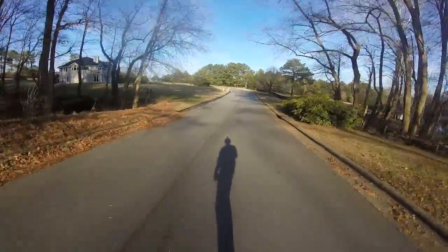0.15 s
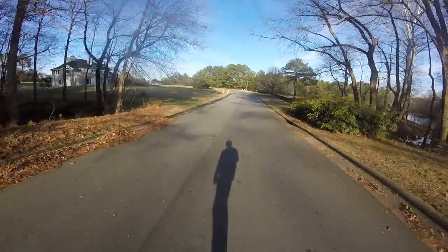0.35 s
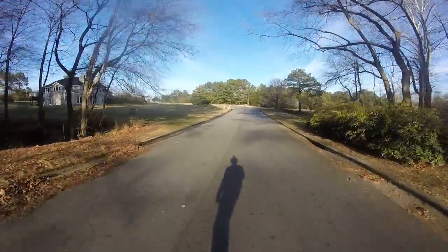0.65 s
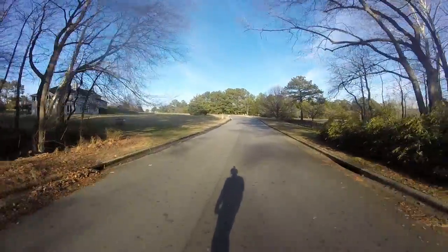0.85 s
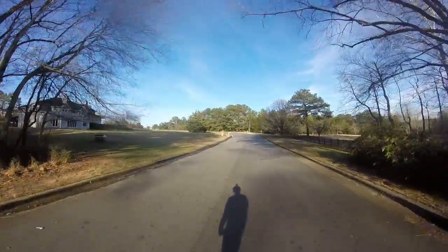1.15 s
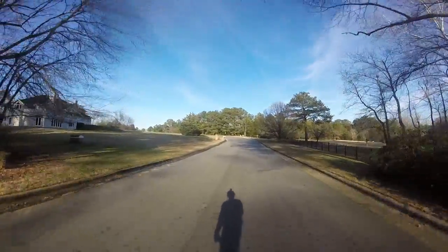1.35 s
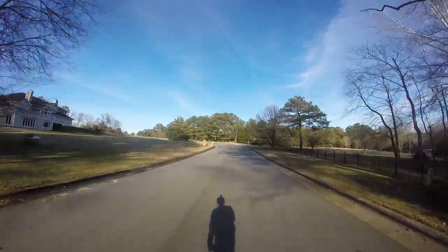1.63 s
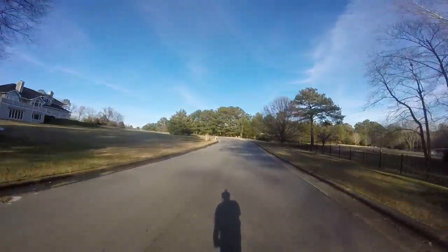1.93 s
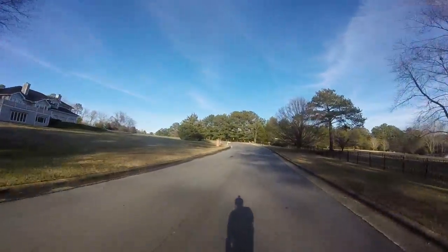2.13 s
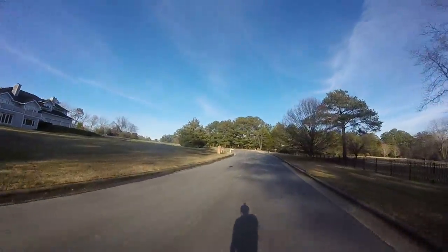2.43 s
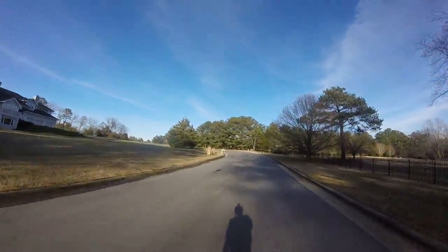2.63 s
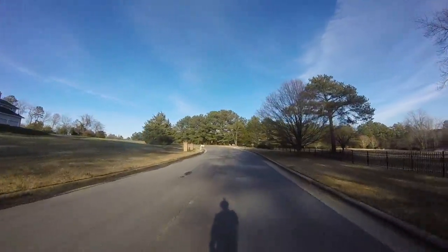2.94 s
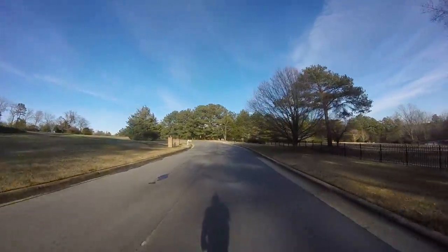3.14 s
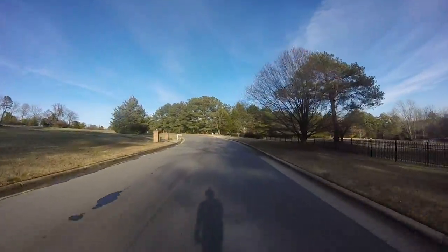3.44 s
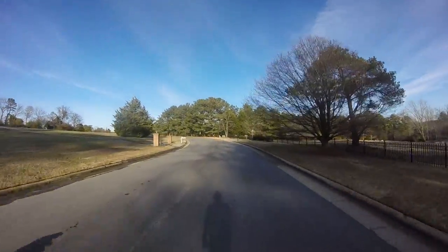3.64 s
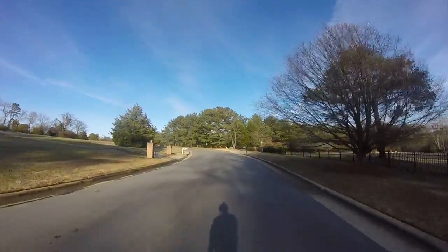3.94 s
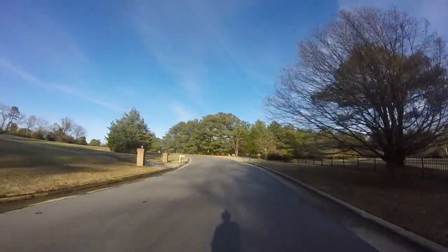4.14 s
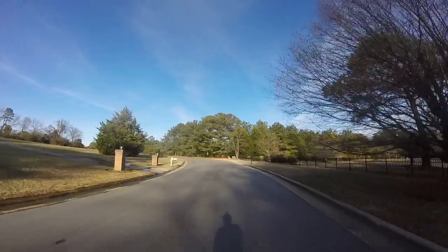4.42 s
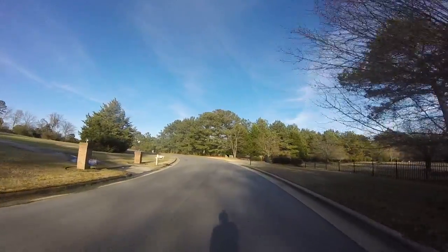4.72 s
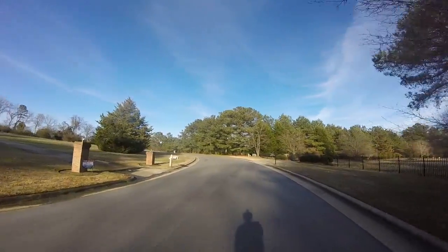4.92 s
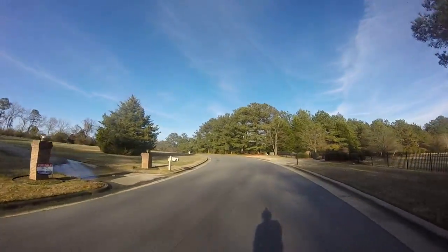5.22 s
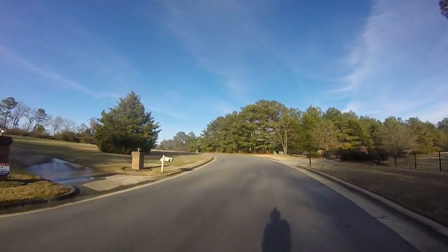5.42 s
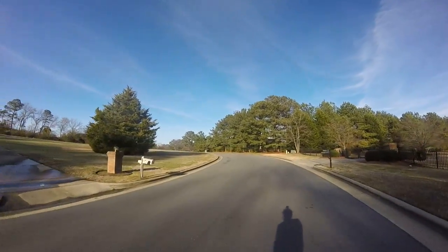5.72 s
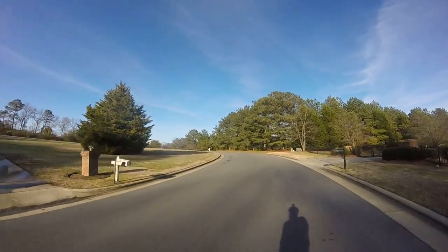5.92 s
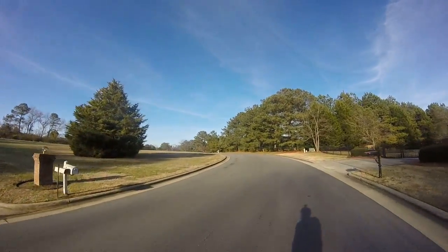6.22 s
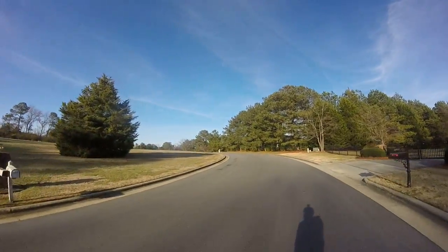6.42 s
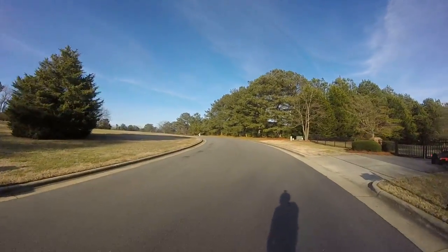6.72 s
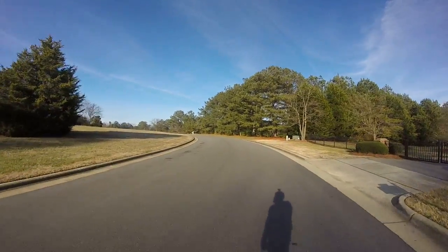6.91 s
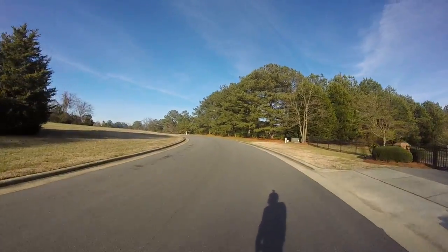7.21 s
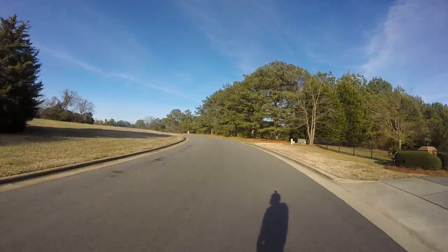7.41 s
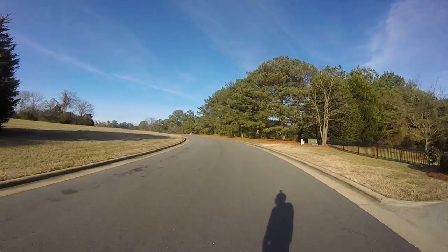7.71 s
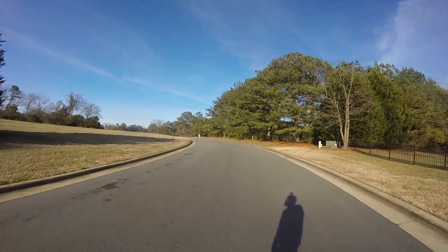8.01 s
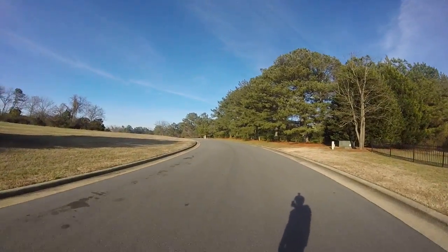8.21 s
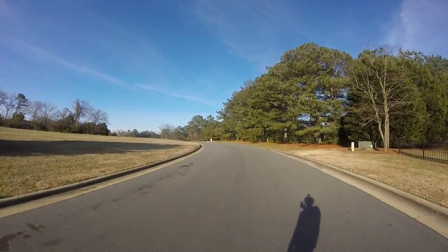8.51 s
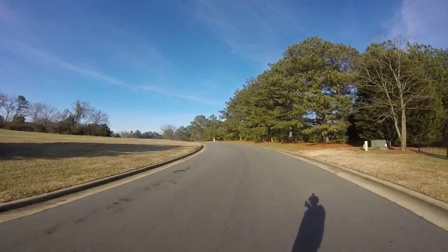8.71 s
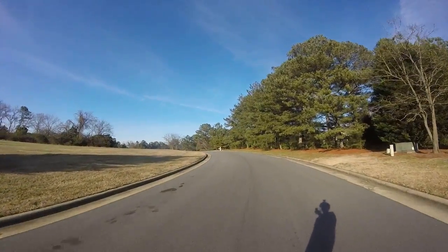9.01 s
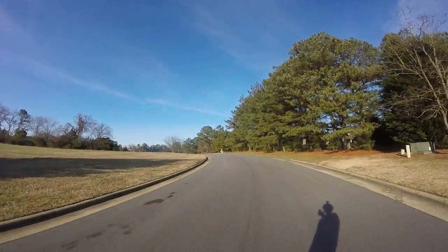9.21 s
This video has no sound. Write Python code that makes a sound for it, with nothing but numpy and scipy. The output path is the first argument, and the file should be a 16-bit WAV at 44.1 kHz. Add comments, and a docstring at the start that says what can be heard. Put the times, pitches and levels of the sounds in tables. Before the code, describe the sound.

Longboard wheels roll on asphalt and gradually slow, with low wind rumble and hollow whistling gusts on the microphone early on.

```python
"""A longboard coasts along an asphalt road and slowly loses speed, heard from a camera worn by the rider.
Road grit rings the wheels and shakes the deck, whose low drone throbs irregularly; two stray pebbles tick.
Head wind rumbles on the microphone and, in gusts, blows across a gap in the camera case: a hollow,
rushing whistle that spits in the early gusts. A faint hiss lies underneath."""
import sys
import numpy as np
from scipy import signal
from scipy.fft import rfft, irfft
from scipy.io import wavfile
from scipy.ndimage import uniform_filter1d

SR = 44100
rng = np.random.default_rng(int(sys.argv[2]) if len(sys.argv) > 2 else 0)


def file_out(sig):
    """Save sig as 16-bit WAV at sys.argv[1]."""
    # one column per channel
    cols = np.atleast_2d(sig).T
    # limit, then scale
    lim = np.clip(cols, -1, 1)
    pcm = np.round(lim * 32767).astype(np.int16)
    wavfile.write(sys.argv[1], SR, pcm)


N = 412335
TIME, FREQ = np.arange(N) / SR, np.arange(N // 2 + 1) * SR / N


def longboard(roll_db, speed_db):
    """Wheels strike the road's stones; slower blows are softer, so the treble fades before the deck."""
    # wheel resonances: f/Hz, width/Hz, level/dB
    wheel_modes = [(763, 230, -18), (888, 53, -12), (1000, 62, -6), (1160, 198, -5), (1552, 233, -0.5),
                   (1732, 310, -1), (2150, 545, -5.5), (2485, 390, -7), (3240, 500, -16), (4000, 390, -22)]
    # spectrum of the tread's sizzle: f/Hz, level/dB
    tread_spectrum = [(3000, 3), (4400, 2), (5300, 6.5), (6300, 14), (7300, 13), (8400, 5.5), (9200, 5.5),
                      (10000, -1), (11000, -7), (13000, -20), (15000, -30)]
    # resonances of deck and trucks: f/Hz, width/Hz, level/dB
    deck_modes = [(146, 51, -5), (199.4, 36.4, 1), (256, 63, -6), (335, 50, -1), (408, 90, -9),
                  (470, 78, -14.5), (536, 63, -9.5), (580, 37, -6.5)]
    road = grit(per_s=20000, spread_db=1.5) * undb(0.32 * walk(40))  # coarse and smooth patches
    wheels = unit(ring(road, wheel_modes, skirt=2.52)) * undb(roll_db + 1.14)
    tread = colour(road, tread_spectrum) * undb(roll_db - 27 + 0.44 * speed_db)
    deck = unit(ring(road, deck_modes, skirt=1.8)) * undb(roll_db - 4.0 - 0.31 * speed_db)
    return wheels + tread + deck + deck_drone(speed_db)


def rolling_level():
    """Rolling level in dB: steady, then sinking ever faster as the board slows; rough road is louder."""
    # coarser and smoother stretches of asphalt: t/s, half length/s, level change/dB
    stretches = [(0.7, 0.24, 1.6), (1.3, 0.24, -0.5), (1.85, 0.15, 1), (4.4, 0.077, -0.5), (4.83, 0.19, 2),
                 (5.15, 0.12, -1), (5.644, 0.26, 1.2), (6.197, 0.08, -1), (6.42, 0.053, 1),
                 (6.7, 0.11, -1.5), (7.85, 0.13, 1.5), (8.6, 0.18, -3), (8.85, 0.05, 0.3),
                 (9.305, 0.027, 2)]
    full_speed_db, slows_at_s = -35.5, 2.095
    slowing_s = np.maximum(TIME - slows_at_s, 0)
    asphalt_db = sum(db * swell(s, half_s) for s, half_s, db in stretches)
    return full_speed_db - 1.93 * slowing_s - 0.112 * slowing_s ** 2 + asphalt_db


def grit(per_s, spread_db):
    """Road grit deals tiny blows of unequal size at random moments."""
    hits = rng.random(N) < per_s / SR
    return unit(hits * noise() * undb(spread_db * noise()))


def deck_drone(speed_db):
    """The flexing deck gives a low drone that follows the speed and throbs irregularly."""
    # bending resonances of the deck: f/Hz, width/Hz, level/dB
    bending_modes = [(105.7, 7.4, 1), (96.7, 12, -5), (87.4, 16, -4.5), (116.3, 22, -15.5)]
    # brief, irregular swells of the drone: t/s, level/dB
    throbs = [(0.15, -32), (0.35, -32.5), (0.52, -32), (0.68, -29), (0.86, -27.5), (0.99, -32.5),
              (1.15, -37), (1.35, -33), (1.6, -37.5), (1.77, -32.5), (1.96, -28.5), (2.2, -31),
              (2.55, -33.5), (3.03, -31.5), (3.43, -32), (3.7, -33.5), (3.9, -33.5), (4.52, -38),
              (4.91, -38), (5.31, -39), (5.55, -34.5), (5.94, -47), (6.7, -47), (7.69, -45), (8.25, -46.5),
              (8.46, -44), (8.77, -41), (8.9, -43)]
    drone = steady(ring(noise(), bending_modes, skirt=1.96), span_s=0.17)
    rolling_power = undb(-41.5 + 0.74 * speed_db) ** 2
    throb_power = sum((undb(db) * swell(s, half_s=0.031)) ** 2 for s, db in throbs)
    return drone * np.sqrt(rolling_power + throb_power)


def pebbles():
    """A loose stone under a wheel ticks for a few milliseconds."""
    # pebble hits: t/s, level/dB
    hits = [(5.509, -51), (6.795, -55)]
    # spectrum of a tick: f/Hz, level/dB
    spectrum = [(1000, -20), (3000, 6), (5300, -5), (7000, -12), (11000, -20), (15000, -32)]
    return sum(undb(db) * swell(s, half_s=0.003) for s, db in hits) * colour(noise(), spectrum)


def gap_whistle():
    """Turbulent air rings the gap in the case; a squarer, harder jet favours the upper resonances."""
    # gap resonances: f/Hz, width/Hz, level/dB, growth/(dB per dB of force), share of the lift/(0-1)
    gap_modes = [(2414, 410, -14, -0.5, 0.23), (2614, 190, -5.5, -0.16, 0), (2768, 154, -4, 0.16, 0),
                 (3194, 180, -6, 0.3, 0), (3440, 280, -5.5, 0.3, 0.27), (3795, 144, -9.5, 0, 0.73),
                 (4183, 130, -16.5, -0.16, 0.96), (4510, 240, -25, 0, 0.8), (4850, 280, -28, 0, 0.7),
                 (5800, 470, -28, -0.1, 0.6), (6228, 346, -13, 0.06, 0.53), (7750, 720, -29.5, 0.5, 0.63),
                 (9260, 650, -38, 0.5, 0.7), (10250, 370, -40, 0.2, 0.7), (11700, 900, -51, 1, .4),
                 (12850, 650, -45, 0.5, 0.6)]
    # brightness from how squarely the air meets the gap: t/s, lift/dB
    edge_lift = [(0, -0.5), (0.7, 1), (1.3, 3), (2.2, 5), (2.45, -2), (3.2, -3), (3.5, -10), (3.95, -7.5),
                 (5.0, -15)]
    blow = airflow()
    force_db = 20 * np.log10(blow / blow.max())
    lift_db = np.interp(TIME, *np.transpose(edge_lift))
    eddies = undb(0.58 * walk(49) + 1.3 * walk(500))  # all resonances flutter together
    whistle = 0
    for hz, width, db, growth, share in gap_modes:
        tone = unit(ring(noise(), [(hz, width, db)], skirt=3.1))
        whistle += tone * undb(db + growth * force_db + share * lift_db)
    return whistle * eddies * blow


def airflow():
    """Strength of the air across the gap: gusts and puffs, whose powers add."""
    # gusts: start/s, end/s, level/dB, rise/(dB/s), sag while held/(dB/s), fall/(dB/s)
    gusts = [(0.0, 0.19, -33, 200, -8, 32), (0.0, 2.26, -31.5, 200, 0, 132),
             (2.36, 2.43, -43, 150, -16, 97), (2.73, 2.84, -51, 60, -7, 80),
             (3.16, 3.25, -39.5, 140, -3, 112), (3.43, 3.96, -28.5, 150, 5, 245),
             (4.14, 4.235, -41, 328, 35, 200), (7.63, 7.934, -43, 55, 2, 55),
             (8.34, 8.48, -53, 128, 18, 250), (8.87, 8.92, -63, 195, 0, 198)]
    # brief puffs: t/s, half length/s, level/dB
    puffs = [(0.074, 0.018, -32), (0.588, 0.014, -30.5), (1.543, 0.035, -36), (1.66, 0.097, -35),
             (2.23, 0.036, -36), (2.873, 0.0067, -46), (2.933, 0.012, -43), (3.026, 0.014, -43.5),
             (3.299, 0.0058, -32.5), (3.834, 0.017, -34), (3.94, 0.015, -31.5), (4.063, 0.0098, -40.5),
             (4.109, 0.0098, -38), (4.23, 0.0088, -39), (5.03, 0.0099, -40.5), (5.075, 0.0076, -39.5),
             (5.325, 0.019, -46.5), (7.452, 0.031, -51), (7.592, 0.025, -44), (7.818, 0.03, -40.5)]
    power = sum((undb(db) * swell(s, half_s)) ** 2 for s, half_s, db in puffs)
    for start, end, db, rise, sag, fall in gusts:
        held_s = np.clip(TIME - start, 0, end - start)
        power += (undb(db - sag * held_s) * burst(start, end, rise, fall)) ** 2
    return np.sqrt(power)


def spitting():
    """The jet breaks up on the case's edge into a fine, fluttering sizzle."""
    # spits: start/s, end/s, level/dB, flutter depth/dB
    spits = [(0.29, 0.712, -53.5, 2.5), (0.75, 1.17, -62, 7), (1.2, 1.43, -59.5, 9.5), (1.5, 1.78, -69, 6),
             (1.827, 2.04, -57, 9.5), (2.08, 2.24, -61.5, 10.5), (2.28, 2.315, -52.5, 5),
             (3.177, 3.183, -61, 8)]
    # spectrum of the sizzle: f/Hz, level/dB
    spectrum = [(4000, -23), (7500, -3), (9100, 1.5), (10400, -5), (11200, -9), (12800, -11), (13600, -21),
                (15000, -23)]
    sizzle = colour(noise(), spectrum)
    flutter = np.tanh(walk(130))
    gains = np.array([undb(db) * burst(start, end, rise=160, fall=350) for start, end, db, _ in spits])
    depth_db = np.array(spits)[:, -1][gains.argmax(axis=0)]  # the strongest spit sets the flutter
    return steady(sizzle * undb(depth_db * flutter), span_s=0.07) * gains.max(axis=0)


def wind_rumble(speed_db):
    """Eddies press on the microphone as a deep rumble that wanders and eases as the board slows."""
    # spectrum of the rumble: f/Hz, level/dB
    spectrum = [(8, -4), (20, -9.5), (32, 7), (45, 2), (62, 3.5), (80, -8), (160, -16), (500, -54),
                (2000, -86)]
    rumble = steady(colour(noise(), spectrum), span_s=0.25)
    return rumble * undb(-44.5 + 0.37 * speed_db + walk(7.7))


def hiss():
    """A faint, steady bed of noise."""
    # spectrum of the hiss: f/Hz, level/dB
    spectrum = [(100, 16), (750, 17.5), (1500, 7), (4000, 1.5), (6000, 0.5), (9000, -6), (12000, -10.5),
                (15000, -15)]
    return colour(noise(), spectrum) * undb(-62.0)


def undb(db):
    """Decibels to gain."""
    return 10 ** (np.asarray(db) / 20)


def unit(x):
    """Scale to rms 1."""
    return x / np.sqrt(np.mean(x ** 2))


def noise():
    """White noise."""
    return rng.standard_normal(N)


def walk(hz):
    """Smooth random drift of rms 1, with little motion faster than hz."""
    return unit(irfft(rfft(noise()) * np.exp(-(FREQ / hz) ** 2), N))


def steady(x, span_s):
    """Even out swells slower than span_s; rms about 1."""
    return x / np.sqrt(uniform_filter1d(x ** 2, int(span_s * SR)) + 1e-12)


def colour(x, spectrum):
    """Shape x by a spectrum of (f/Hz, level/dB) points; rms 1."""
    hz, db = np.transpose(spectrum)
    gain = undb(np.interp(np.log(FREQ + 1), np.log(hz), db))
    return unit(irfft(rfft(x) * gain, N))


def ring(x, modes, skirt):
    """Pass x through resonances whose powers add; a larger skirt makes their flanks steeper."""
    bend = 2 ** (1 / skirt) - 1  # keeps the half-power width
    power = 0
    for hz, width, db in modes:
        detune = (FREQ - hz ** 2 / (FREQ + 1)) / width
        power += undb(db) ** 2 * (1 + bend * detune ** 2) ** -skirt
    return irfft(rfft(x) * np.sqrt(power), N)


def swell(s, half_s):
    """A rounded rise and fall around time s; peak 1."""
    return 1 / (1 + ((TIME - s) / half_s) ** 4)


def burst(start, end, rise, fall):
    """Gain that reaches 1 at start, holds until end and dies away; slopes in dB/s."""
    down_db = rise * np.maximum(start - TIME, 0) + fall * np.maximum(TIME - end, 0)
    return undb(-np.minimum(down_db, 200))


def scene():
    """Board and wind over a faint hiss, in mono."""
    roll_db = rolling_level()
    speed_db = roll_db - roll_db.mean()  # rolling level above its mean stands for the speed
    board = longboard(roll_db, speed_db) + pebbles()
    wind = gap_whistle() + spitting() + wind_rumble(speed_db)
    return (board + wind + hiss())[None]


def record(dry):
    """The camera cuts the top treble steeply."""
    top_hz = 15050
    return signal.sosfilt(signal.ellip(10, 0.2, 80, top_hz, fs=SR, output="sos"), dry)


dry = scene()
out = record(dry)
file_out(out)
```